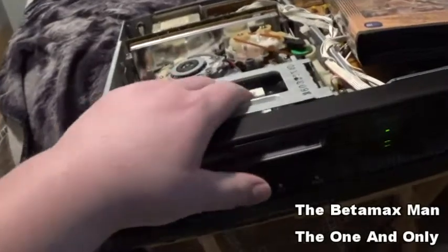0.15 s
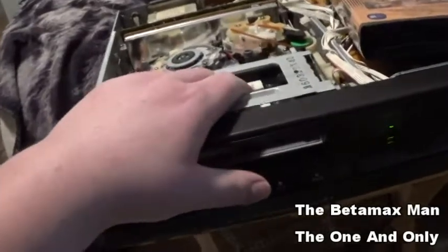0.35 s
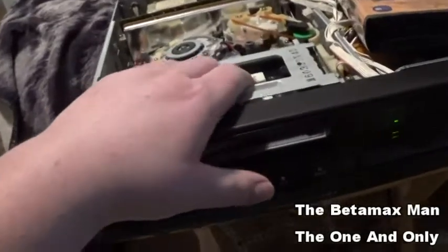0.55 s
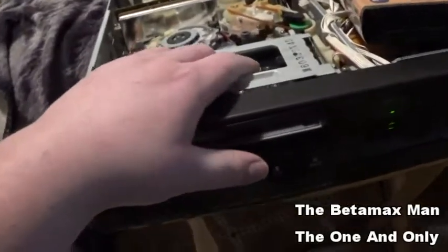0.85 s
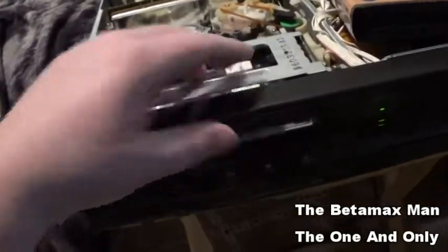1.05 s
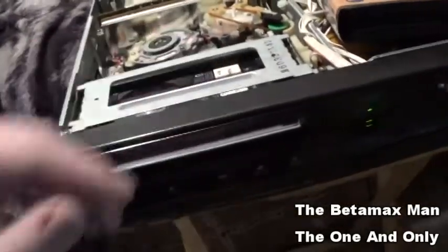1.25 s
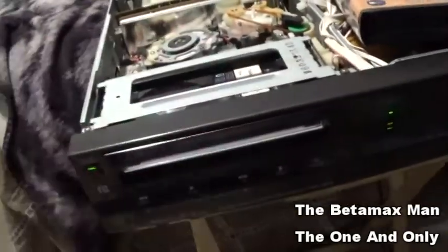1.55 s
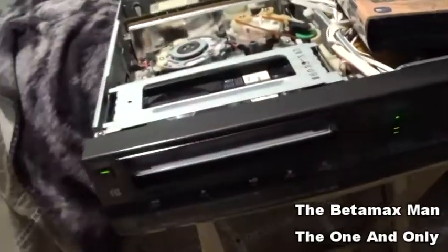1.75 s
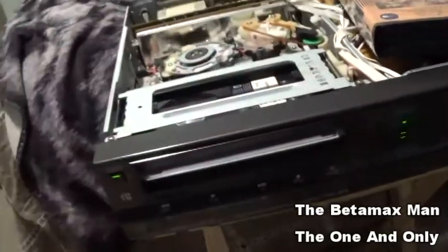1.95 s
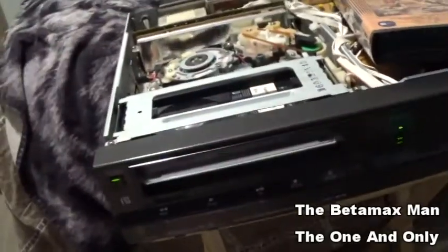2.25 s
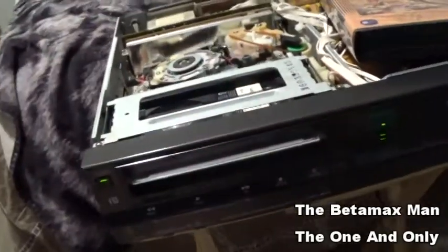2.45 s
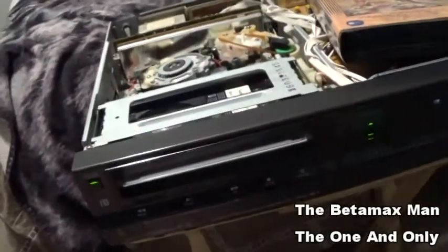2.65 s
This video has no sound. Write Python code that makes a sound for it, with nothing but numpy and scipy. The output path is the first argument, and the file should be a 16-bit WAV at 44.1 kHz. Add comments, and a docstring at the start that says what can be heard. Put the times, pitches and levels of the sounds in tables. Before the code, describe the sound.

An open tape deck's small motor buzzes twice through plastic gears, each run ending in loud clicks

```python
"""Video cassette deck winding twice

An open video cassette deck on a blanket winds out and back, close to the microphones in a small room.
Its small motor whines through plastic gears (mesh tones and rasping noise) and chatters once a turn.
Latches click (noise bursts and chassis modes), the housing knocks, and loose parts shake after each stop.
The deck hums steadily underneath as wavering tones over filtered-noise room tone."""
import sys
import numpy as np
from scipy import signal
from scipy.fft import rfft, irfft
from scipy.io import wavfile

SR = 44100
rng = np.random.default_rng(int(sys.argv[2]) if len(sys.argv) > 2 else 0)


def wav_out(sig):
    """Save sig, one row per channel (or a flat mono array), as 16-bit PCM at SR to the path in sys.argv[1]."""
    wavfile.write(sys.argv[1], SR, np.round(np.clip(np.atleast_2d(sig).T, -1, 1) * 32767).astype(np.int16))


N = 123479
T = np.arange(N) / SR

# ring of the loose, chattering shaft: (f/Hz, relative level/dB)
SHAFT_COLOUR = [(1000, -46), (5500, -40), (6500, -21), (6850, -7.5), (7200, 3.5), (7500, -3), (7770, -7),
                (8200, 0.5), (8900, -4), (9400, -15), (9800, -9), (10500, -20), (11000, -20.5)]
# room tone: (f/Hz, relative level/dB)
ROOM_TONE_COLOUR = [(20, -10), (60, -3.5), (110, 4), (200, 0), (400, -4), (700, -19), (1200, -6),
                    (2500, -14), (6000, -21.5), (11000, -48)]
TICK_RISE_S = 0.0012  # onset of the clicks and of the pawl


def amp(db):
    """Amplitude ratio of a level in dB."""
    return 10 ** (np.asarray(db) / 20)


def unit(x):
    """Scale to an rms of 1."""
    return x / np.sqrt(np.mean(x ** 2) + 1e-20)


def read(points, hz):
    """Read a (f/Hz, value) curve along a logarithmic frequency axis."""
    f, value = np.transpose(points)
    return np.interp(np.log(hz + 1), np.log(f + 1), value)


def colour(x, points):
    """Minimum-phase filter with the given spectrum, so that nothing sounds ahead of its cause."""
    log_gain = np.log(amp(read(points, abs(np.fft.fftfreq(4096, 1 / SR)))))
    taps = np.fft.ifft(np.exp(np.conj(signal.hilbert(log_gain)))).real
    return signal.oaconvolve(x, taps[:len(taps) // 2])[:N]


def noise():
    """White noise as long as the scene."""
    return rng.standard_normal(N)


def drift(seconds):
    """Smooth random wander of rms 1; longer seconds make it slower."""
    lowpass = np.exp(-(np.fft.rfftfreq(N, 1 / SR) * seconds) ** 2)
    return unit(irfft(rfft(noise()) * lowpass, N))


def dying(t, t60):
    """Exponential decay by 60 dB in t60 seconds, held at 1 before t = 0."""
    return np.exp(-np.log(1000) * np.maximum(t, 0) / t60)


def add(mix, s, sound):
    """Lay a short sound into the mix at s seconds."""
    part = mix[round(s * SR):][:len(sound)]
    part += sound[:len(part)]


def ring(modes, t):
    """Struck modes (f/Hz, level/dB, t60/s), decaying sines that each start at a random phase."""
    return sum(amp(db) * dying(t, t60) * np.sin(2 * np.pi * (hz * t + rng.random()))
               for hz, db, t60 in modes)


def hum():
    """The deck's hum, tones wavering in phase and level, over the room tone."""
    # (f/Hz, level/dB)
    hum_tones = [(102.3, -64), (136.3, -54.5)]
    waver = 0.1  # rms, radians of phase and share of level
    room_tone_db = -55
    tones = 0
    for hz, db in hum_tones:
        tone = np.sin(2 * np.pi * hz * T + waver * drift(0.073))
        tones = tones + amp(db) * unit(tone * (1 + waver * drift(0.056)))
    return tones + amp(room_tone_db) * unit(colour(noise(), ROOM_TONE_COLOUR))


def settling():
    """Loose parts shake grainily after each stop, under a soft hiss of parts coasting."""
    # shakes: (t/s, level/dB, hold/s, t60/s)
    shakes = [(1.301, -25.5, 0.026, 0.24), (2.482, -38.5, 0.044, 0.17)]
    # shaking parts: (f/Hz, relative level/dB)
    shake_colour = [(80, -19), (170, -15), (280, 1), (450, -5), (620, -7.5), (950, 4), (1400, 0),
                    (1900, -4.5), (3600, -2.5), (4700, -9), (6000, -7), (9000, -4), (11000, -13.5)]
    # hiss of parts coasting: (t/s, level/dB)
    coast_level = [(0, -47), (.06, -51), (.11, -58.5), (.2, -62), (1.3, -47), (1.42, -62), (1.5, -47),
                   (2.5, -50), (2.58, -48.5), (2.68, -48.5), (2.8, -56)]
    # the same hiss: (f/Hz, relative level/dB)
    coast_colour = [(100, -7), (350, 3.5), (620, 7.5), (850, 6.5), (1400, -2.5), (2200, -1), (3100, -1.5),
                    (5000, -3), (9000, 2), (11000, -7)]
    shake = sum(amp(db) * (T > s) * dying(T - s - hold, t60) for s, db, hold, t60 in shakes)
    grains = unit(colour(noise() * amp(1.84 * drift(0.0018)), shake_colour))
    hiss = unit(colour(noise(), coast_colour))
    return shake * grains + amp(np.interp(T, *np.transpose(coast_level))) * hiss


def knocks():
    """The housing answers heavier movements with hollow modes and a noise thud; a pawl drops last."""
    # dull knocks: (t/s, level/dB, tilt/dB per octave, thud level against the modes/dB)
    knock_list = [(0.2075, -23, -6, -2.5), (0.233, -31.5, 7, -3.5), (0.2845, -30.5, 12, -9),
                  (0.875, -35, -4, -1)]
    # housing modes: (f/Hz, level/dB before tilt, t60/s)
    housing = [(414, -21, 0.049), (510, -7, 0.092), (607, -3.5, 0.084), (722, -5.5, 0.16), (820, -7, 0.13),
               (1055, -10, .05)]
    # thud: (f/Hz, relative level/dB)
    thud_colour = [(200, -32), (320, -9.5), (420, 0), (560, 2), (800, 2.5), (1100, -3), (2500, -43)]
    # pawl modes: (f/Hz, level/dB, t60/s)
    pawl = [(1117, -1, 0.036), (2560, -5, 0.023), (2950, 2.5, 0.016), (3200, -4, 0.02), (4150, 0.5, 0.019)]
    pawl_s, pawl_db = 2.6788, -35
    thud_t60, knock_rise_s = 0.098, 0.0014
    out, t = np.zeros(N), np.arange(SR // 4) / SR
    thud_noise = unit(colour(noise(), thud_colour))
    pivot_hz = housing[2][0]
    for s, db, tilt, thud_db in knock_list:
        thud = amp(thud_db) * thud_noise[round(s * SR):][:len(t)] * dying(t, thud_t60)
        modes = [(hz, level + tilt * np.log2(hz / pivot_hz), t60) for hz, level, t60 in housing]
        add(out, s, amp(db) * np.minimum(t / knock_rise_s, 1) * (ring(modes, t) + thud))
    add(out, pawl_s, amp(pawl_db) * np.minimum(t / TICK_RISE_S, 1) * ring(pawl, t))
    return out


def clicks():
    """Latches and levers click: a short crunch of contacts, banded noise, rings the chassis modes."""
    # clicks: (t/s, low level/dB, mid level/dB, high level/dB, top level/dB, crunch t60/s)
    click_list = [(0.032, -38, -48, -67, -55, 0.059), (0.0727, -49, -53, -43.5, -45, 0.016),
                  (0.1966, -50, -40, -51, -48, .02), (0.2006, -40, -34.5, -29.5, -23, 0.023),
                  (0.208, -44, -37, -33.5, -35, 0.11), (0.2285, -42, -36.5, -37, -32.5, 0.14),
                  (0.2835, -53, -38.5, -51, -33, 0.022), (0.8205, -59, -27, -27.5, -21.5, 0.05),
                  (1.266, -37, -28, -23, -18.5, 0.021), (1.295, -36, -21, -21, -15, 0.022),
                  (1.314, -38.5, -29.5, -35, -36, 0.031), (1.326, -34, -35, -34, -35, .025),
                  (1.574, -35, -37, -32, -43, 0.036), (2.419, -56, -34, -31.5, -33, .02),
                  (2.428, -44, -28.5, -27, -22.5, .022), (2.4787, -61, -27, -22, -18.5, 0.022),
                  (2.501, -37.5, -35, -33.5, -47, 0.076), (2.531, -36.5, -37, -32, -36, 0.042)]
    # edges of the four bands: f/Hz
    band_edges = [260, 900, 2400, 5600, 12000]
    # chassis modes: (f/Hz, level against the crunch spectrum/dB, t60/s)
    chassis = [(1142, 3, 0.072), (1500, -14, 0.022), (1816, 3.5, 0.05), (2100, 3.5, 0.043),
               (2910, -1.5, 0.069), (3799, 0, 0.055), (4730, -12, .025), (6030, -11, 0.034),
               (9500, -10, 0.022)]
    hold_s, ring_db = 0.0021, -7
    out, t = np.zeros(N), np.arange(SR // 5) / SR
    edges = list(zip(band_edges, band_edges[1:]))
    centres = np.sqrt(np.prod(edges, 1))
    bands = [signal.butter(5, e, "band", fs=SR, output="sos") for e in edges]
    for s, *levels, t60 in click_list:
        crunch = sum(amp(db) * unit(signal.sosfilt(band, rng.standard_normal(len(t))))
                     for band, db in zip(bands, levels))
        strength = list(zip(centres, levels))
        body = ring([(hz, db + read(strength, hz), life) for hz, db, life in chassis], t)
        click = crunch * dying(t - hold_s, t60) + amp(ring_db) * body
        add(out, s, np.minimum(t / TICK_RISE_S, 1) * click)
    return out


def slaps():
    """Now and then the loose shaft gives a harder slap, a dying burst of shaft-coloured noise."""
    # (t/s, level/dB)
    slap_list = [(0.0541, -26.5), (0.548, -17.5), (0.6, -17), (0.652, -17), (0.7018, -16), (0.8596, -22.5),
                 (0.9128, -15.5), (1.0183, -17), (1.5273, -24), (1.7, -17), (1.875, -23), (1.989, -21),
                 (2.051, -14.5), (2.271, -19)]
    slap_t60 = .013
    strokes = sum(amp(db) * (T > s) * dying(T - s, slap_t60) for s, db in slap_list)
    return unit(colour(noise(), SHAFT_COLOUR)) * strokes


def motor(spell, speed, whine_curve, gear_colour):
    """Shaft chatter that swells once a turn, rasping gear teeth and their whining mesh tones."""
    # mesh tones: (share of the whine pitch, relative level/dB)
    meshes = [(1, 0), (.8, -8)]
    start, first, stop, spin_up, chatter_db, gear_db = spell
    turns = np.cumsum(np.interp(T, *np.transpose(speed))) / SR
    turns -= np.interp(first, T, turns)  # a whole turn falls on the first chatter
    stop_s = 0.0071  # run-down time constant
    running = 1 - np.exp(-np.maximum(T - start, 0) / spin_up)
    running *= np.exp(-np.maximum(T - stop, 0) / stop_s)

    # chatter: random ticks, strongest as the shaft passes one angle
    ticks_per_s, tick_spread_db, turn_spread_db = 2800, 4.5, 0.4
    beat_db, beat_width = 6.5, .21  # width in turns
    slap_db, slap_width = 2.5, .06  # sharper peak on the beat
    angle = (turns + .5) % 1 - .5
    beat = np.exp(-(angle / beat_width) ** 2)
    slap = np.exp(-(angle / slap_width) ** 2)
    each_turn = rng.standard_normal(N)[np.round(turns).astype(int)]
    ticks = (rng.random(N) < ticks_per_s / SR) * np.sign(noise())
    ticks *= amp(tick_spread_db * np.minimum(noise(), 1))
    swell_db = beat * (beat_db + turn_spread_db * each_turn) + slap_db * slap
    chatter = unit(colour(ticks * amp(swell_db), SHAFT_COLOUR))

    # whine: mesh tones that wander in phase and flutter in level
    at, pitch, level = np.transpose(whine_curve)
    mesh_wander, wander_s, mesh_flutter = .05, .02, .25  # cycles rms, s, share rms
    cycles = np.cumsum(np.interp(T, at, pitch)) / SR
    mesh = 2 * np.pi * (cycles + mesh_wander * drift(wander_s))
    whine = unit(sum(amp(db) * np.sin(share * mesh) * (1 + mesh_flutter * drift(0.0092))
                     for share, db in meshes))

    # rasp: noise pulsing with every tooth and twice a turn
    tooth_depth, gear_beat_db, load_db_per_s = .6, 1.0, 1.5
    teeth = 1 + tooth_depth * np.cos(mesh)
    uneven = amp(gear_beat_db * (np.cos(4 * np.pi * turns) + drift(0.0033)))
    rasp = unit(colour(noise() * teeth * uneven, gear_colour))
    load = amp(load_db_per_s * (T - (start + stop) / 2))  # the rasp grows through the spell

    whine_level = amp(np.interp(T, at, level))
    return running * (amp(chatter_db) * chatter + load * amp(gear_db) * rasp + whine_level * whine)


def room(x):
    """Quick sparse reflections inside the open case, then a room tail whose decay varies with pitch."""
    # room decay: (f/Hz, t60/s)
    room_decay = [(200, 1), (1000, 0.46), (4000, 0.43), (10000, 0.35)]
    tail_db, early_db, early_s = -12, -11.5, 0.0057  # early_s is a decay time constant
    t = np.arange(SR // 2) / SR
    taps = rng.standard_normal((2, len(t))) * (rng.random((2, len(t))) < .08) * (t > .001)
    early = taps[0] * np.exp(-t / early_s)
    hz, at, z = signal.stft(taps[1], SR, nperseg=256)
    tail = signal.istft(z * dying(at, read(room_decay, hz)[:, None]), SR)[1][:len(t)]
    early = amp(early_db) * early / np.linalg.norm(early)
    tail = amp(tail_db) * tail / np.linalg.norm(tail)
    return x + signal.oaconvolve(x, early + tail)[:N]


def spread(x):
    """Scattered sound reaches the two microphones a little differently, as a side signal."""
    # left-right spread: (f/Hz, side level/dB)
    width = [(100, -27.5), (500, -12.5), (1200, -11.5), (2800, -10.5), (5000, -10), (8000, -18),
             (11000, -14.5)]
    scatter_s = .03  # decay time constant
    t = np.arange(SR // 6) / SR
    scatter = rng.standard_normal(len(t)) * np.exp(-t / scatter_s)
    side = colour(signal.oaconvolve(x, scatter / np.linalg.norm(scatter))[:N], width)
    return np.array([x + side, x - side])


def scene():
    """Two spells of the motor with their clicks in the room, over the hum."""
    # spells: (start t/s, first chatter t/s, stop t/s, spin-up/s, chatter level/dB, gear rasp level/dB)
    spells = [(0.265, 0.285, 1.298, 0.055, -28, -33.5), (1.508, 1.5284, 2.487, 0.025, -28, -33)]
    # motor speed: (t/s, speed/turns per s)
    speed_out = [(0.287, 35), (0.36, 37.73), (0.48, 37.7), (0.62, 36), (0.901, 38.33), (1.1, 36.6),
                 (1.292, 40.3)]
    speed_back = [(1.529, 29.02), (1.62, 36.39), (1.8, 33.82), (2.0, 34.96), (2.2, 35.75), (2.35, 35.49),
                  (2.48, 32.06)]
    # gear whine, which sags under load: (t/s, pitch f/Hz, level/dB)
    whine_out = [(0.301, 1042, -39.5), (0.421, 1125, -54), (0.602, 1166, -46.5), (0.7, 1147, -38.5),
                 (0.78, 1160, -45), (0.9, 1145, -39), (1.08, 1134, -41.5), (1.181, 1145, -40.5),
                 (1.28, 1105, -35.5)]
    whine_back = [(1.53, 900, -40.5), (1.611, 1070, -43), (1.68, 1090, -44.5), (1.8, 1015, -49.5),
                  (1.874, 985, -33.5), (1.95, 1010, -60), (2.08, 1075, -42.5), (2.3, 1085, -54),
                  (2.45, 988, -38.5)]
    # gear rasp in each direction: (f/Hz, relative level/dB)
    gears_out = [(80, -23), (190, -13), (260, -5.5), (520, -5), (610, -8), (680, -8.5), (900, -1.5),
                 (1130, 0.5), (1350, 1), (1630, -11), (1800, -5), (2400, -5), (2700, -7.5), (3450, -1.5),
                 (4100, -7.5), (4500, -1.5), (5400, -9), (5900, -2.5), (6300, -5.5), (11000, -7)]
    gears_back = [(80, -16), (220, -11), (400, -2), (520, -6), (610, -14), (680, -6.5), (760, -3.5),
                  (1000, 4), (1350, 2), (1630, -7.5), (2080, 0), (2600, -7), (3200, 0), (3800, -4.5),
                  (4400, -2), (5200, -7.5), (6300, -3.5), (11000, -8.5)]
    drive = motor(spells[0], speed_out, whine_out, gears_out)
    drive = drive + motor(spells[1], speed_back, whine_back, gears_back)
    deck = spread(room(drive + slaps() + clicks() + knocks() + settling()))
    air_side_db = -65  # room tone that differs between the microphones
    air = amp(air_side_db) * unit(colour(noise(), ROOM_TONE_COLOUR))
    return deck + hum() + np.array([air, -air])


def record(dry):
    """The recorder's band limit, a steep low-pass."""
    edge_hz = 11150
    lowpass = signal.firwin(401, edge_hz, window=("kaiser", 8), fs=SR)
    return signal.oaconvolve(dry, lowpass[None], "same")


dry = scene()
out = record(dry)
wav_out(out)
```